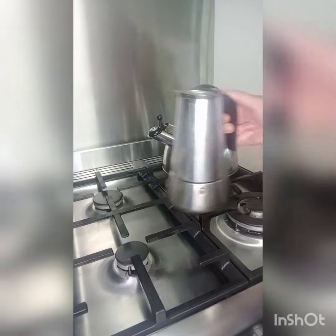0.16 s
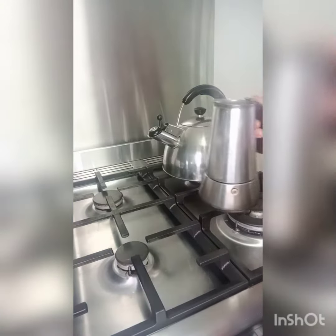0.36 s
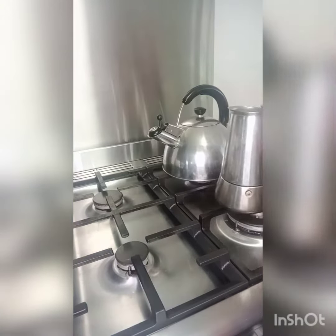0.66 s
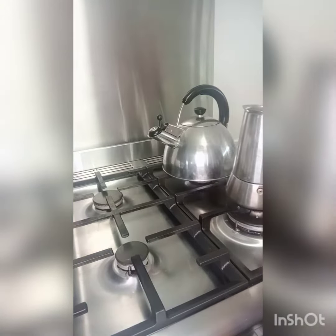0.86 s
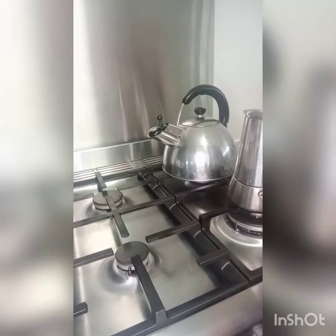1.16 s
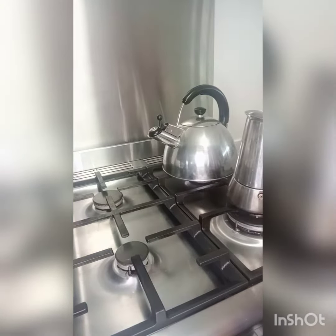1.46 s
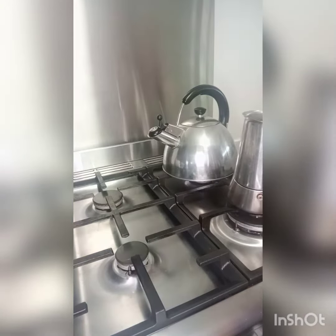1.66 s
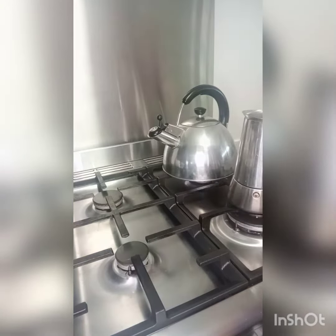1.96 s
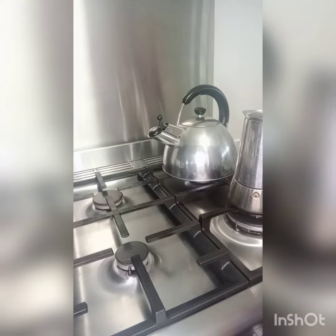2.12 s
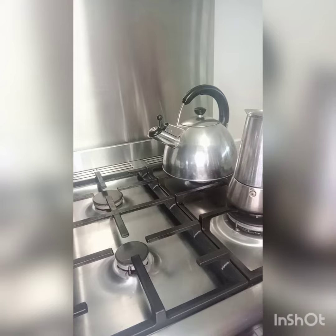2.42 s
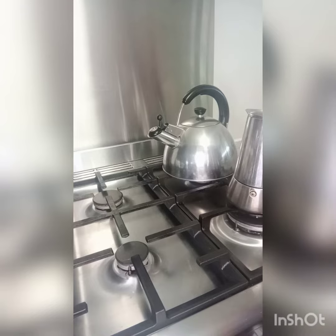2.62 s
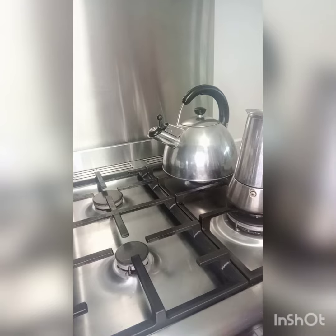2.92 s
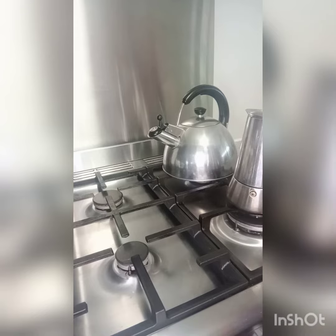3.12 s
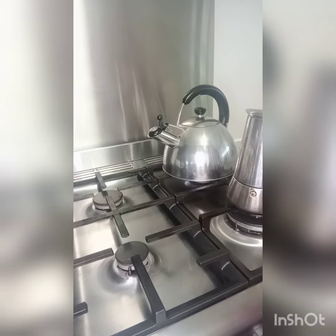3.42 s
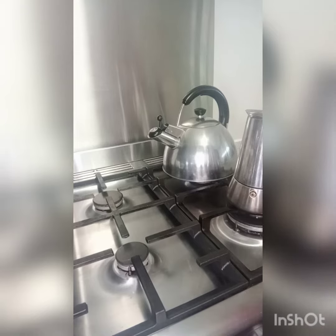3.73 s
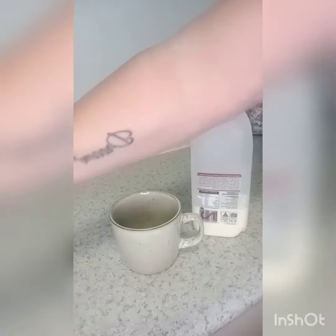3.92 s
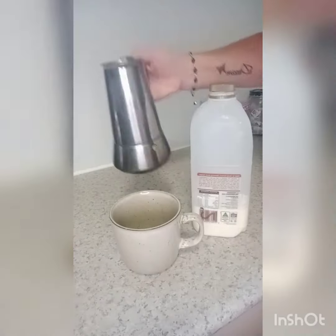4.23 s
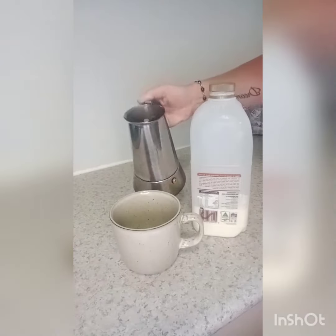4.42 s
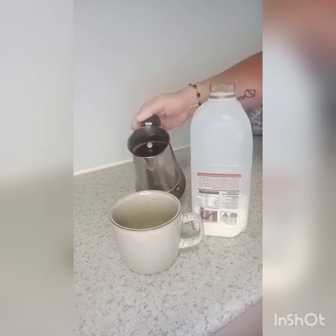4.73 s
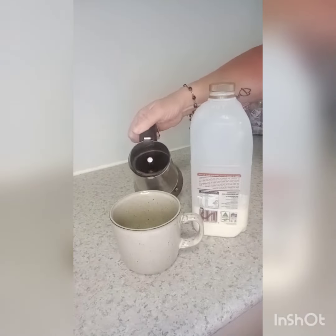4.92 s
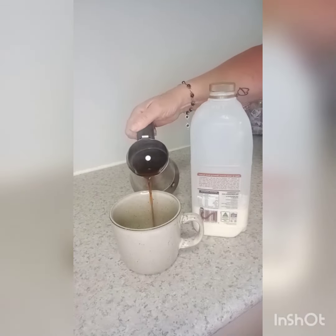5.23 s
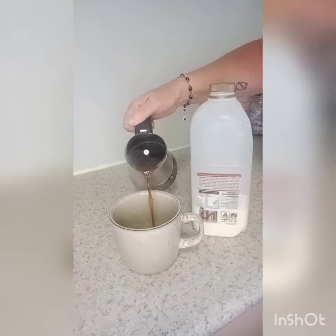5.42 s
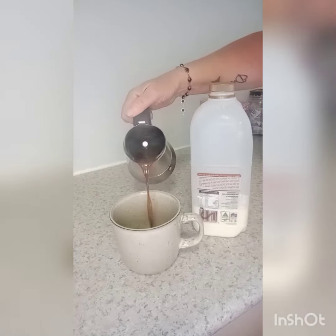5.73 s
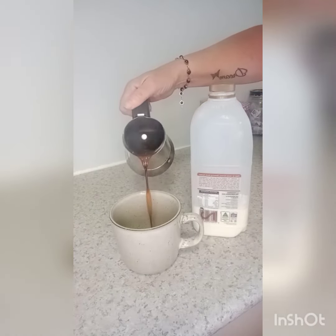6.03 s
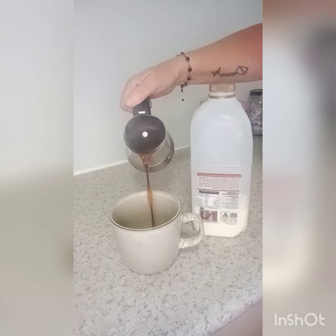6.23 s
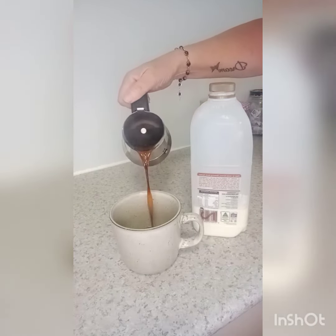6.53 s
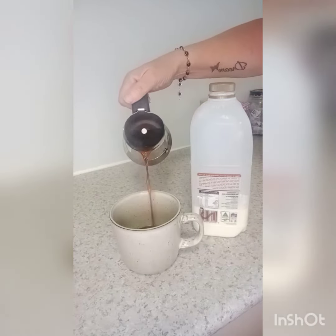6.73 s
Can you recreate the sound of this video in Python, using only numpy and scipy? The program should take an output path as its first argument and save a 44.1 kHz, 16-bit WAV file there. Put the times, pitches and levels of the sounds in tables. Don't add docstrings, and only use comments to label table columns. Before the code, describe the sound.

Busy metallic bubbling fills the first half, with clustered mid-pitched knocks ringing a pot shell over deep watery glugs. A bright iron clank and dull thud interrupt it as the pot is put down. After a tiny silence the scene switches to a quiet counter: soft thumps, a handle creak and liquid slosh, then wet ticks on glaze turning into rounded bubbling in a mug. Short room echo, wavering thin phone hiss.

```python
import sys
import numpy as np
from scipy import signal
from scipy.fft import rfft, irfft
from scipy.io import wavfile
from scipy.ndimage import uniform_filter1d

SR = 44100
rng = np.random.default_rng(int(sys.argv[2]) if len(sys.argv) > 2 else 0)


def voltage_ratio(decibels):
    exponent = np.asarray(decibels, float) / 20
    return 10 ** exponent


def dump(signal):
    limited = np.clip(np.atleast_2d(signal).T, -1, 1)
    pcm = np.round(limited * 32767).astype(np.int16)
    wavfile.write(sys.argv[1], SR, pcm)


N = 302967
T = np.arange(N) / SR
SCENE_CHANGE_S = 3.746
HEARD = (T < SCENE_CHANGE_S) | (T > 3.795)


def rms_one(x):
    return x / np.sqrt(np.mean(x ** 2) + 1e-20)


def levels(rows):
    s, *columns = np.transpose(rows)
    return [voltage_ratio(np.interp(T, s, c, left=-200, right=-200)) for c in columns]


def coloured(x, points):
    hz, level_db = np.transpose(points)
    grid = np.maximum(np.arange(N // 2 + 1) * SR / N, 1)
    gain = voltage_ratio(np.interp(np.log(grid), np.log(hz), level_db))
    return rms_one(irfft(rfft(x) * gain, N))


def band(x, low_hz, high_hz):
    return signal.sosfilt(signal.butter(2, [low_hz, high_hz], "band", fs=SR, output="sos"), x + 1e-18)


def drift(rate):
    r = np.exp(-80 * np.pi * rate / SR)
    slow = signal.lfilter([1], [1, -2 * r, r * r], rng.standard_normal(N // 40 + 1002))[1000:]
    return np.interp(np.arange(N) / 40, np.arange(len(slow)), rms_one(slow))


def body(x, peaks, vary_db=0):
    out = 0
    for k, (hz, width, level_db) in enumerate(peaks):
        r = np.exp(-np.pi * width / SR)
        a = [1, -2 * r * np.cos(2 * np.pi * hz / SR), r * r]
        b = [(1 - r * r) / 2, 0, (r * r - 1) / 2]
        wander_db = vary_db * drift(19.7) if vary_db else 0
        drive = x * voltage_ratio(level_db + wander_db)
        out = out + (-1) ** k * signal.lfilter(b, a, drive + 1e-18)
    return out


def grains(per_s, spread_db, clump_db):
    born = rng.random(N) < per_s * voltage_ratio(clump_db * drift(25)) / SR
    size = voltage_ratio(spread_db * np.minimum(rng.exponential(1, N), 4))
    return rms_one(born * size * rng.choice([-1, 1], N))


def add(track, s, sound):
    i = round(s * SR)
    track[i:i + len(sound)] += sound[:N - i]


def fall(t60, rise):
    t = np.arange(round(abs(t60) * SR) + 8) / SR
    return (1 - np.exp(-t / abs(rise))) * voltage_ratio(-60 * t / abs(t60))


def blip(hz, cycles, glide, swell):
    shape = fall(cycles / hz, rise=swell / hz) ** 2
    t = np.arange(len(shape)) / SR
    return shape / shape.max() * np.sin(2 * np.pi * hz * t * (1 + glide * t * hz / cycles))


def splat(hz, t60, spread, noise):
    shape = fall(t60, rise=0.0014)
    return shape * rms_one(band(noise[:len(shape)], hz / spread, min(hz * spread, .45 * SR)))


def knocks():
    # start in seconds, peak in dB, ring in Hz.
    collapses = [(0.0092, -38, 1890), (0.0187, -27.5, 1265), (0.0409, -24.5, 1244), (0.047, -26.5, 1290),
                 (0.1066, -24.5, 1610), (0.1117, -21, 1340), (0.2147, -29, 1700), (0.2773, -22, 1316),
                 (0.2883, -26.5, 1250), (0.309, -25.5, 1276), (0.3413, -31, 1294), (0.3716, -23, 1334),
                 (0.3848, -28, 1810), (0.396, -34, 1460), (0.417, -34, 1340), (0.432, -38, 1290),
                 (0.443, -29, 1280), (0.481, -19.5, 1290), (0.4885, -20, 1293), (0.5013, -40, 1230),
                 (0.508, -35, 1250), (0.575, -30.5, 1370), (0.6092, -29, 1720), (0.6458, -23, 1314),
                 (0.653, -32, 1680), (0.6618, -29.5, 1360), (0.6696, -34, 1720), (0.7109, -24, 1190),
                 (0.719, -32, 1700), (0.7237, -32.5, 1210), (0.803, -23.5, 1320), (0.8418, -29, 1300),
                 (0.8708, -35, 1200), (0.904, -29.5, 1250), (0.9254, -27, 1330), (0.935, -34.5, 1180),
                 (0.943, -27.5, 1730), (0.9599, -27.5, 1260), (0.984, -29, 1287), (1.0312, -21, 1273),
                 (1.049, -35, 1580), (1.0553, -28, 1290), (1.137, -24.5, 1270), (1.181, -34, 1700),
                 (1.2308, -32, 1260),
                 (1.2632, -33, 1215), (1.341, -32.5, 1230), (1.3663, -23.5, 1286), (1.372, -45, 1720),
              (1.3811, -24.5, 1277), (1.4552, -26, 1590), (1.4633, -27, 1500), (1.532, -32, 1350),
              (1.5377, -25.5, 1290), (1.5467, -33, 1250), (1.5843, -34, 1560), (1.6672, -28, 1720),
              (1.692, -24, 1520), (1.7377, -28, 1320), (1.749, -21.5, 1290), (1.7554, -31, 1255),
              (1.7687, -30.5, 1650), (1.8574, -23.5, 1300), (1.8811, -24.5, 1290), (1.887, -49, 1280),
              (1.941, -30.5, 1660), (1.9714, -30.5, 1220), (2.018, -28.5, 1500), (2.0263, -32.5, 1480),
              (2.0822, -29.5, 1220), (2.0868, -31.5, 1290), (2.0934, -22.5, 1290), (2.105, -45, 1290),
              (2.1772, -23.5, 1360), (2.1854, -30, 1300), (2.2011, -30.5, 1243), (2.225, -36, 1410),
              (2.2388, -23.5, 1275), (2.2533, -31.5, 1310), (2.2618, -32, 1320), (2.3134, -22.5, 1290),
              (2.335, -29, 1250), (2.3491, -22.5, 1280), (2.3593, -25, 1233), (2.412, -33.5, 1340),
              (2.421, -33.5, 1720), (2.4411, -21.5, 1296), (2.448, -47, 1300), (2.4575, -26, 1230),
              (2.497, -31, 1340), (2.504, -29.5, 1235),
                 (2.515, -33, 1680), (2.5294, -30, 1310), (2.5357, -39, 1520), (2.543, -28, 1285),
            (2.569, -27, 1307), (2.601, -25.5, 1440), (2.6033, -29.5, 1380), (2.6169, -23.5, 1294),
            (2.6272, -24.5, 1263), (2.641, -34, 1220), (2.6862, -20.5, 1290), (2.6928, -21.5, 1377),
            (2.702, -34, 1170), (2.718, -38, 1530), (2.779, -28, 1318), (2.7847, -32.5, 1274),
            (2.808, -30, 1335), (2.8713, -36, 1800), (2.892, -32, 1510), (2.905, -32.5, 1590),
            (2.936, -34, 1750), (2.9729, -28, 1420), (3.0134, -34, 1450), (3.0346, -37, 1440),
            (3.0822, -27.5, 1370), (3.124, -24, 1276), (3.1489, -34, 1410), (3.201, -27, 1316),
            (3.211, -29, 1290), (3.2573, -24, 1196), (3.2906, -24.5, 1370), (3.2936, -33, 1290),
            (3.3813, -32, 1610), (3.385, -34.5, 1580), (3.4058, -35, 1670), (3.4243, -28, 1290),
            (3.434, -51, 1230), (3.465, -36, 1340), (3.526, -29.5, 1297), (3.5767, -30.5, 1253),
            (3.6134, -28.0, 1720), (3.621, -33, 1290), (3.6641, -29, 1760), (3.674, -42, 1620),
            (3.684, -46, 1570), (3.709, -28, 1700), (3.7309, -34, 1710)]
    # start in seconds, peak in dB.
    openers = [(0.168, -39), (0.2096, -28), (0.338, -19), (0.3671, -25.5), (0.43, -34), (0.5703, -24),
               (1.5276, -23), (1.6525, -26.5), (1.732, -21.5), (1.8508, -18.5), (1.939, -28.5),
               (1.964, -24), (2.014, -25), (2.438, -18), (2.966, -26.5), (3.007, -25)]
    opener_hz = 1273
    burst, tone, blow = np.zeros((3, N))
    for s, level_db, hz in collapses + [(*row, opener_hz) for row in openers]:
        add(burst, s, voltage_ratio(level_db) * fall(0.047, rise=0.00078))
        add(tone, s, voltage_ratio(level_db - 2.0) * blip(hz, cycles=97.0, glide=0.0074, swell=0.84))
        add(blow, s, voltage_ratio(level_db + 14.0) * np.hanning(9))
    return burst, tone, blow


def glugs():
    # start in seconds, peak in dB, pitch in Hz.
    turnovers = [(0.016, -30, 240), (0.172, -28.5, 350), (0.283, -52, 390), (0.487, -31, 274),
                 (0.603, -24.5, 274), (1.077, -23, 277), (1.249, -25.5, 276), (1.449, -28.5, 295),
                 (1.498, -27, 255), (1.625, -26, 254), (2.014, -28, 380), (2.178, -25.5, 257),
                 (2.221, -24, 260), (2.53, -29, 277), (2.598, -25.5, 273), (2.686, -44, 306),
                 (2.804, -27, 279), (2.895, -33, 244), (2.966, -33.5, 244), (3.011, -33, 395),
                 (3.08, -23.5, 251), (3.125, -28.5, 245), (3.206, -45, 520), (3.291, -36, 260),
                 (3.385, -29.5, 248), (3.463, -25, 310), (3.548, -24, 345), (3.612, -33, 247)]
    tone, heave = np.zeros((2, N))
    for s, level_db, hz in turnovers:
        add(tone, s, voltage_ratio(level_db - 12) * blip(hz, cycles=22., glide=.15, swell=1.2))
        add(heave, s, voltage_ratio(level_db + 4.5) * fall(0.048, rise=0.0043))
    return tone, heave


def pot_shell(burst, blow, seethe, tone):
    # pitch in Hz, width in Hz, level in dB.
    shell_peaks = [(820, 244, -6), (1256, 73.3, 14.5), (1290, 164, 8), (1487.5, 17, 7), (1700, 74, 1.5),
                   (2025, 37, -3), (2203, 1340, -3.5), (2280, 307, -2)]
    impacts = grains(4000, spread_db=2.2, clump_db=1.5)
    unit = np.std(body(impacts[:SR], shell_peaks))
    strength = voltage_ratio(-10.0) * burst + voltage_ratio(-4.5 + 1.5 * drift(16.0)) * seethe
    drive = strength * impacts / unit + blow
    ringing = band(body(drive, shell_peaks, vary_db=2.0), low_hz=693, high_hz=5000)
    direct = voltage_ratio(-21.0) * band(drive, low_hz=1055, high_hz=2580)
    sound = ringing + direct + tone
    leak = voltage_ratio(-15.5) * band(sound, low_hz=2300, high_hz=2720)
    return signal.sosfilt(signal.ellip(7, 1, 34, 2420, fs=SR, output="sos"), sound) + leak


def upper_wall(burst, seethe):
    # start in seconds, peak in dB, pitch in Hz.
    spits = [(0.3677, -47, 3850), (0.4938, -51, 2980), (0.5756, -51, 3560), (2.689, -57, 4030),
             (1.18, -44.5, 3140), (2.872, -58, 3950), (1.457, -52, 3150), (1.7362, -42, 3700),
             (1.8077, -56.5, 3750), (2.252, -62, 4060), (2.34, -49, 3660), (2.437, -54, 3870),
             (2.597, -54, 4000), (2.7392, -48, 3980), (2.966, -50, 3080), (3.012, -54, 4050),
             (3.2587, -48.5, 3980), (3.382, -56, 3920)]
    # pitch in Hz, width in Hz, level in dB.
    wall_peaks = [(3230, 76, -3.5), (3980, 290, 8), (4810, 61, -2), (4800, 180, 4.5), (4830, 140, 0.5),
                  (5380, 49, 1.5), (8440, 790, -3.5)]
    bright, spit = np.zeros((2, N))
    for (s, level_db, hz), noise in zip(spits, rng.standard_normal((len(spits), SR // 4))):
        add(bright, s, voltage_ratio(level_db) * fall(0.041, rise=0.012))
        add(spit, s, voltage_ratio(level_db - 9.5) * splat(hz, t60=0.14, spread=1.045, noise=noise))
    strength = bright + voltage_ratio(-43.0) * burst + voltage_ratio(-33.5 + 4.5 * drift(11.3)) * seethe
    wall = body(strength * rng.standard_normal(N), wall_peaks, vary_db=4.5)
    return voltage_ratio(1.5) * wall + spit


def deep_boil(burst, heave, rumble):
    # frequency in Hz, level in dB per Hz.
    rumble_colour = [(30, -74), (123, 1.5), (198, -12), (254, -1.5), (408, -6), (606, -12.5), (910, -38),
                     (1540, -120)]
    deep = coloured(rng.standard_normal(N), rumble_colour)
    low = voltage_ratio(-9) * band(deep * heave, low_hz=170, high_hz=600)
    low += deep * (rumble * voltage_ratio(5 * drift(12) - 3) + voltage_ratio(-20) * burst)
    # pitch in Hz, width in Hz, level in dB.
    pitches = [(255, 20, 10.5), (415, 31, 5), (544, 80, -18.5), (344, 59, -6)]
    small = body(grains(160, spread_db=2.5, clump_db=5.5), pitches, vary_db=7.0)
    return low + voltage_ratio(8.5) * rumble * rms_one(band(small, low_hz=190, high_hz=780))


def boil():
    # time in seconds, seethe in dB, rumble in dB.
    simmer = [(0.0, -40, -66), (3.57, -41.5, -66), (3.74, -43, -63)]
    seethe, rumble = levels(simmer)
    burst, knock_tone, blow = knocks()
    glug_tone, heave = glugs()
    shell = pot_shell(burst, blow, seethe, knock_tone + glug_tone)
    return shell + upper_wall(burst, seethe) + deep_boil(burst, heave, rumble)


def kitchen(x, t60):
    tail = fall(t60, rise=0.011)
    tail = tail * rng.standard_normal(SR)[:len(tail)]
    return signal.fftconvolve(x, tail / np.sqrt(np.sum(tail ** 2)))[:N]


def whine():
    # time in seconds, pitch in Hz, level in dB.
    path = [(0.0, 10070, -25), (1.6, 10460, -18.5), (2.2, 12400, -13), (3.7, 13400, -13), (3.899, 9850, -7),
            (4.599, 10500, -20), (4.95, 10740, -3.5), (5.4, 10440, -14), (6.87, 11000, -26)]
    s, hz, level_db = np.transpose(path)
    turn = 2 * np.pi * np.cumsum(np.interp(T, s, hz)) / SR
    return voltage_ratio(np.interp(T, s, level_db)) * (drift(150) * np.cos(turn) + drift(150) * np.sin(turn))


def microphone_hiss():
    # frequency in Hz, level in dB per Hz.
    hiss_colour = [(1530, -13.5), (2760, -6.5), (3870, -8), (6170, -14.5), (8580, -12), (11500, -11),
                   (14400, -13), (15500, -7.5)]
    # centre in Hz, width in Hz, level in dB.
    standing = [(8840, 1200, -6), (10550, 260, 0.5), (15030, 330, 3), (14400, 730, 4.5)]
    hiss = coloured(rng.standard_normal(N), hiss_colour)
    hiss = hiss + voltage_ratio(3.0) * body(hiss[::-1], standing) + whine()
    edges = np.linspace(1800, 16200, 21)
    patches = 0
    for k in range(20):
        patches = patches + (-1) ** k * band(hiss, *edges[k:k + 2]) * voltage_ratio(2.2 * drift(3.3))
    return rms_one(patches)


def set_down():
    # start in seconds, crack
    # in dB, thud in dB, rise in seconds, decay in seconds.
    contacts = [(0.617, -29, -23, 0.029, 0.082), (0.641, -37, -40, 0.0089, 0.11),
                (0.9295, -33, -32, 0.0003, 0.19), (1.18, -64, -34, 0.0064, 0.16)]
    # pitch in Hz, width in Hz, level in dB.
    grate_peaks = [(3500, 58, 4), (3760, 110, 14), (3800, 15, 22), (4170, 69, 5), (4330, 94, 4),
                   (4800, 130, 12), (5070, 60, 5), (5740, 58, -7), (6600, 77, -11), (8800, 200, -6)]
    ring_db, ring_loss_db_per_s = -12, 4306
    clank, crack, thud = np.zeros((3, N))
    for s, crack_db, thud_db, rise, t60 in contacts:
        add(clank, s, voltage_ratio(crack_db + ring_db - ring_loss_db_per_s * rise) * fall(t60, rise))
        add(crack, s, voltage_ratio(crack_db) * fall(t60 * 0.7, rise))
        add(thud, s, voltage_ratio(thud_db) * fall(t60 * 1.59, rise + 0.0068))
    white = rng.standard_normal((2, N))
    rough = crack * white[0]
    dull = band(band(rough, low_hz=2300, high_hz=5500), low_hz=2000, high_hz=5800)
    ringing = band(body(clank * white[0], grate_peaks), low_hz=2010, high_hz=6440)
    scrape = voltage_ratio(-8.5) * band((T < .9) * rough, low_hz=6940, high_hz=15500)
    low_thud = thud * rms_one(band(white[1], low_hz=60, high_hz=350))
    return voltage_ratio(5.5) * ringing + dull + scrape + low_thud


def lift():
    # start in seconds, length in seconds, slosh in dB, hand thump in dB.
    moves = [(3.799, 0.15, -47.5, -55), (3.876, 0.059, -52, -46.5), (3.923, 0.036, -44.5, -51.5),
             (3.99, 0.058, -63.5, -71), (4.101, 0.1, -49.5, -60.5), (4.181, 0.11, -55.5, -72.5),
             (4.352, 0.091, -62.5, -69), (4.456, 0.12, -60.5, -61.5), (4.582, 0.17, -58, -65.5),
             (4.656, 0.1, -60.5, -66), (4.766, 0.034, -62.5, -64), (4.853, 0.035, -63, -70),
             (4.911, 0.032, -48.5, -63), (4.946, 0.011, -51, -62.5), (4.991, 0.064, -49.5, -61.5),
             (5.077, 0.063, -56, -70), (5.143, 0.042, -52, -60), (5.176, 0.11, -66.5, -71),
             (5.454, 0.085, -62, -66.5), (5.605, 0.085, -57.5, -69), (5.704, 0.16, -51.5, -74)]
    # pitch in Hz, width in Hz, level in dB.
    slosh_peaks = [(740, 220, -10.5), (1248, 112, 3), (1432, 108, 4.5), (1438, 58, 3.5), (1720, 195, -2)]
    tilt_s = 4.88
    rustle_db, rustle_slope = -58, 2.06
    slosh, thump, rustle = np.zeros((3, N))
    for s, length, slosh_db, thump_db in moves:
        swell = np.sin(np.pi * np.linspace(0, 1, round(length * SR)) ** 0.87) ** 1.42
        add(slosh, s, voltage_ratio(slosh_db) * swell)
        add(thump, s, voltage_ratio(thump_db) * swell)
        add(rustle, s, voltage_ratio(rustle_db + rustle_slope * (thump_db + 50.5)) * swell)
    inside = grains(3000, spread_db=1.0, clump_db=6.0)
    wet = body(inside, slosh_peaks, vary_db=4.0) + voltage_ratio(-37.0) * band(inside, low_hz=985, high_hz=1940)
    out = slosh * rms_one(wet)
    out = signal.sosfilt(signal.butter(3, [650, 2000], "band", fs=SR, output="sos"), out)
    damped = voltage_ratio(4.5) * band(band(out, low_hz=775, high_hz=1346), low_hz=690, high_hz=1450)
    out = np.where(T < tilt_s, out, damped)
    out += thump * voltage_ratio(4.0 * drift(46)) * rms_one(band(rng.standard_normal(N), low_hz=84.5, high_hz=392))
    return out + handle(rustle) + squeaks()


def handle(rustle):
    # pitch in Hz, width in Hz, level in dB.
    handle_peaks = [(209, 42, 2), (1290, 67, 0), (1520, 95, 6.5), (2840, 140, -7), (4070, 240, -24),
                    (5880, 140, -11), (6800, 55, -11), (7230, 130, -19)]
    # start in seconds, peak in dB.
    creaks = [(3.877, -34), (3.897, -36), (3.903, -28), (3.9348, -33)]
    rub = grains(5000, spread_db=2.5, clump_db=3.0)
    out = rustle * rms_one(band(body(rub, handle_peaks) + voltage_ratio(-14.5) * rub, low_hz=1760, high_hz=8760))
    creak = np.zeros(N)
    for s, level_db in creaks:
        add(creak, s, voltage_ratio(level_db + 23) * fall(0.0025, rise=0.00025))
    return out + body(creak * rng.standard_normal(N), handle_peaks)


def squeaks():
    # start in seconds, level in dB, pitch in Hz, length in seconds.
    calls = [(3.998, -76.5, 5800, 0.097), (4.12, -79, 4800, 0.1), (4.514, -79, 5200, 0.066),
             (5.154, -77, 3850, 0.054)]
    out = np.zeros(N)
    for (s, level_db, hz, length), noise in zip(calls, rng.standard_normal((len(calls), SR // 4))):
        swell = np.sin(np.pi * np.linspace(0, 1, round(length * SR)))
        narrow = rms_one(band(noise, hz - 110., hz + 76.0))
        add(out, s, voltage_ratio(level_db) * swell * narrow[-len(swell):])
    return out


def splashes(spray, drops):
    # start in seconds, peak in dB, pitch in Hz.
    hits = [(5.333, -24.5, 3380), (5.3842, -27, 2400), (5.42, -32, 2800), (5.426, -26.5, 2530),
            (5.433, -27, 3900), (5.44, -42, 2900), (5.4834, -47, 2470), (5.364, -32, 2400),
            (5.308, -55, 2340), (5.516, -24.5, 2300), (5.528, -23.5, 4440), (5.555, -32, 3160),
            (5.6118, -30.5, 3830), (5.8253, -29.5, 2000), (5.85, -34, 2800), (5.8995, -29.5, 2300),
            (5.96, -36, 3950), (6.0615, -36, 2730), (6.103, -29, 2500), (6.2776, -33, 2280),
            (6.4526, -50, 2500), (6.4776, -25, 2500), (6.544, -28, 2500), (6.658, -28, 3850),
            (6.728, -25, 2540), (6.796, -26.5, 2520)]
    # start in seconds, peak in dB.
    tiny = [(5.042, -56.5), (5.222, -61), (5.363, -52.5), (5.4335, -49.5), (5.525, -48), (6.06, -43),
            (6.3556, -43.5), (6.4772, -50.5)]
    # pitch in Hz, width in Hz, level in dB.
    glaze_peaks = [(2250, 570, 0), (2500, 150, 8), (2833, 99, 1), (3330, 140, 0.5), (3850, 170, -2),
                   (4770, 360, -6), (5440, 670, -8.5), (7300, 470, -12.5)]
    snap_db = -56.5
    out, spatter, snap = np.zeros((3, N))
    for (s, level_db, hz), noise in zip(hits, rng.standard_normal((len(hits), SR // 4))):
        add(spatter, s, voltage_ratio(level_db) * fall(0.024, rise=0.0016))
        add(out, s, voltage_ratio(level_db - 16.5) * splat(hz, t60=0.033, spread=1.075, noise=noise))
    for s, level_db in tiny + [(s, db + snap_db) for s, db, hz in hits]:
        add(snap, s, voltage_ratio(level_db) * fall(0.032, rise=0.002))
    strength = spray * voltage_ratio(2.0 * drift(11.4)) + voltage_ratio(-20.0) * spatter
    unit = np.std(body(drops[:SR], glaze_peaks))
    out += body(drops * strength, glaze_peaks, vary_db=3.0) / unit
    bright = band(snap * rng.standard_normal(N), low_hz=4700, high_hz=9500)
    return out + voltage_ratio(6.5) * band(bright, low_hz=4030, high_hz=9900)


def pool(churn):
    # start in seconds, peak in dB, pitch in Hz.
    bubbles = [(5.799, -38, 864), (5.8299, -37, 1230), (5.8484, -36, 820), (5.8684, -35, 1140),
               (5.8758, -40.0, 970), (5.8833, -29.5, 1150), (5.9018, -27.5, 840), (5.9139, -38, 920),
               (5.9606, -29.5, 808), (5.9844, -39, 1290), (6.0364, -22, 842), (6.0513, -48, 1000),
               (6.0615, -22.5, 820), (6.0782, -36, 860), (6.0917, -46, 850), (6.104, -32, 840),
               (6.1159, -24.5, 800), (6.1351, -33, 814), (6.147, -38, 860), (6.1642, -37, 870),
               (6.1792, -44, 880), (6.1973, -27, 818), (6.2053, -38, 840), (6.2245, -42, 780),
               (6.2329, -33, 840), (6.2456, -22, 825), (6.2665, -33, 870), (6.2777, -31, 820),
               (6.2951, -40, 1260), (6.338, -27, 876), (6.3505, -33, 910), (6.3709, -34, 816),
               (6.4174, -38, 724), (6.4348, -37, 744), (6.4547, -22, 805), (6.4781, -30, 854),
               (6.4859, -50, 773), (6.5008, -28.5, 780), (6.5148, -39, 860), (6.5273, -43, 815),
               (6.5453, -21, 780), (6.5821, -34, 680), (6.6043, -41, 880), (6.638, -37.5, 710),
               (6.6604, -35.5, 760), (6.6862, -34, 720), (6.7087, -32, 703), (6.7448, -36, 720),
               (6.778, -36, 603), (6.81, -47, 650)]
    # pitch in Hz, width in Hz, level in dB.
    mug_peaks = [(757, 87, -2.5), (780, 55, 3), (924, 78, -4.5), (1080, 100, -11), (1250, 82, -5)]
    pops, taps = np.zeros((2, N))
    for s, level_db, hz in bubbles:
        add(pops, s, voltage_ratio(level_db - 1.1) * blip(hz, cycles=17.3, glide=0.012, swell=3.9))
        add(taps, s, voltage_ratio(level_db + 4.5) * np.hanning(25))
    ringing = voltage_ratio(1.5) * body(pops + taps, mug_peaks)
    out = band(voltage_ratio(-1.0) * pops + ringing, low_hz=610, high_hz=1700)
    froth = body(grains(500, spread_db=5.0, clump_db=1.0), mug_peaks, vary_db=2.0)
    return out + churn * rms_one(band(froth, low_hz=560, high_hz=1500))


def pour():
    # time in seconds, churn in dB, spray in dB, mug hum in dB.
    stream = [(5.3, -72.5, -74, -75), (5.45, -61, -61.5, -64.5), (5.7, -64, -66.5, -78),
              (5.8, -51, -62, -62.5), (6.05, -47.5, -62.5, -62), (6.35, -47.5, -60, -57.5),
              (6.6, -48, -66.5, -56.5), (6.8, -51, -58.5, -57), (6.87, -64, -88, -73)]
    # pitch in Hz, width in Hz, level in dB.
    hum_peaks = [(302, 23.6, 3), (149, 58, -7)]
    churn, spray, hum = levels(stream)
    drops = grains(6000, spread_db=4.5, clump_db=3.5)
    mist = band(band(hum * drops, low_hz=13700, high_hz=16000), low_hz=13200, high_hz=16000)
    low_hum = hum * rms_one(body(grains(1500, spread_db=1.5, clump_db=2.5), hum_peaks))
    return splashes(spray, drops) + pool(churn) + voltage_ratio(2.5) * mist + low_hum


def scene():
    at_stove = T < SCENE_CHANGE_S
    stove = boil() + set_down()
    counter = lift() + pour()
    wet = kitchen(stove, t60=0.062) * at_stove + kitchen(counter, t60=0.08)
    return np.tile(stove * at_stove + counter + voltage_ratio(-8) * wet, (2, 1))


def roll_off(x):
    return signal.sosfilt(signal.butter(12, 16730, fs=SR, output="sos"), x)


def record(dry):
    # time in seconds, level in dB.
    hiss_levels = [
        [(0.0, -66.5), (1.26, -72), (3.74, -69)],
        [(3.79, -75), (5.3, -74), (6.78, -65.5), (6.87, -69)],
    ]
    # frequency in Hz, level in dB per Hz.
    floor_colour = [(24, -18.5), (40, -0.5), (214, 0), (1060, -17.5), (1260, -7), (2120, -22), (4000, -42),
                    (8800, -120)]
    # frequency in Hz, level in dB per Hz.
    side_colour = [(30, -16), (125, 3.5), (500, -5), (1200, -2.5), (2200, -6.5), (4800, -8.5), (8000, -23),
                   (15000, -21.5)]
    at_stove = T < SCENE_CHANGE_S
    swell = sum(levels(rows)[0] for rows in hiss_levels)
    size = np.abs(dry[0]) + 1e-6
    loud = uniform_filter1d(size, size=900) / uniform_filter1d(size, size=9000)
    breath = loud ** np.where(at_stove, .07, .2)
    flutter = voltage_ratio(np.where(at_stove, .6, 1.2) * drift(40.))
    floor = voltage_ratio(-73) * coloured(rng.standard_normal(N), floor_colour) * HEARD
    mid = dry[0] + swell * breath * flutter * microphone_hiss() + floor
    mid = signal.sosfilt(signal.butter(2, 75, "high", fs=SR, output="sos"), mid)
    follow = uniform_filter1d(np.abs(mid), size=2000) ** 0.16 * HEARD
    side = voltage_ratio(-71.5) * follow * coloured(rng.standard_normal(N), side_colour)
    side += voltage_ratio(-46) * mid * drift(60)
    both = mid + side * [[1], [-1]]
    both = signal.sosfilt(signal.ellip(10, 1, 60, 15600, fs=SR, output="sos"), both)
    fade = np.clip((6.875 - T) / 0.058, 0, 1) ** 0.82
    return roll_off(both * fade)


dry = scene()
out = record(dry)
dump(out)
```